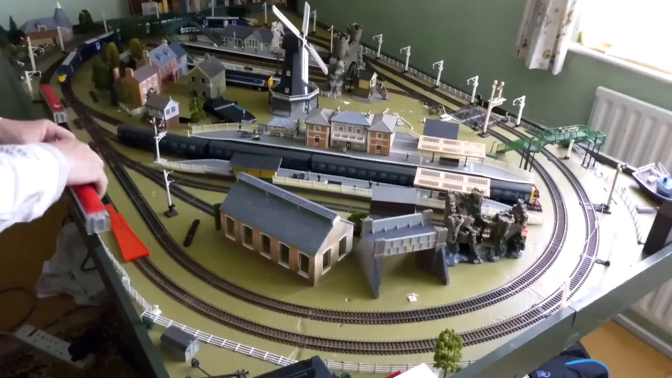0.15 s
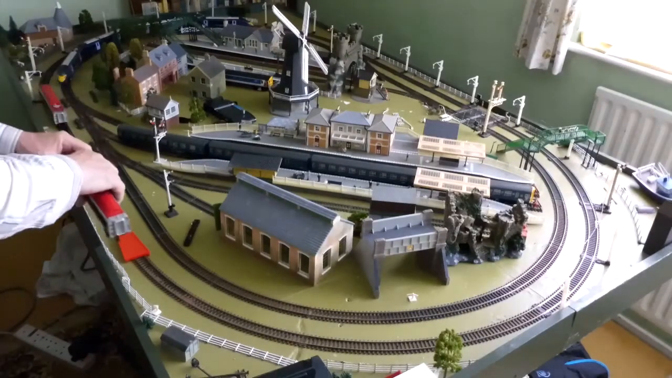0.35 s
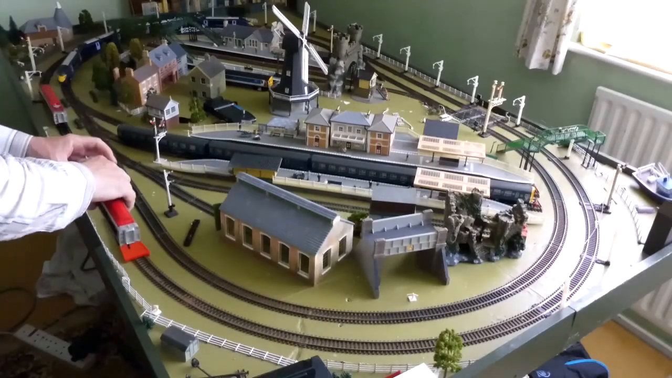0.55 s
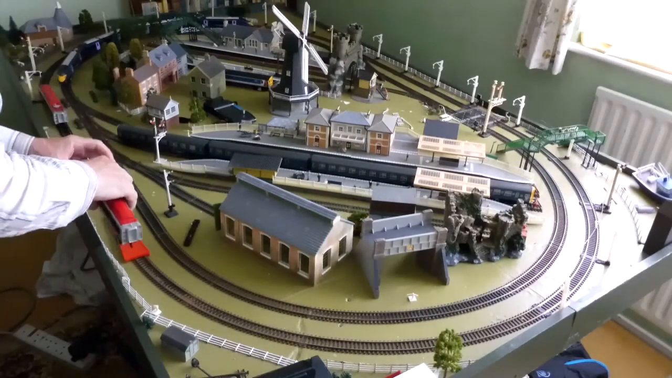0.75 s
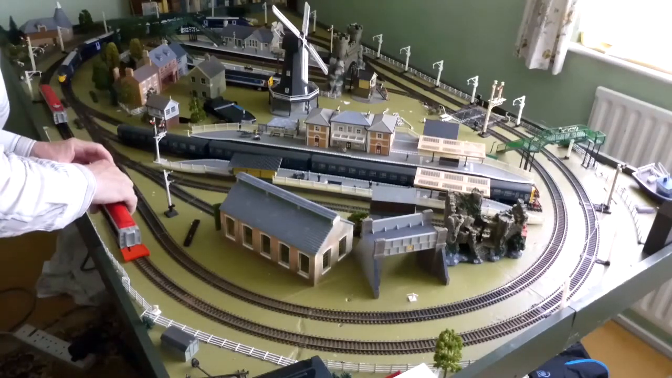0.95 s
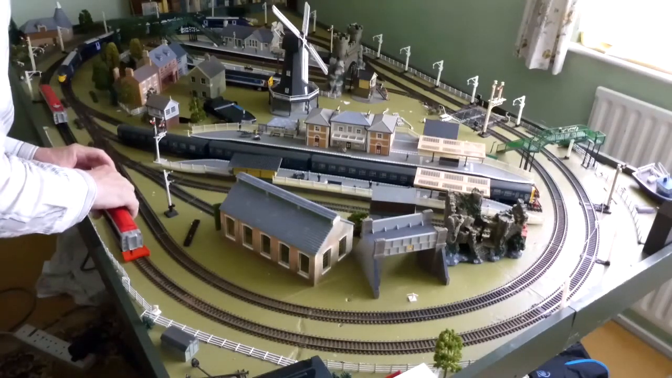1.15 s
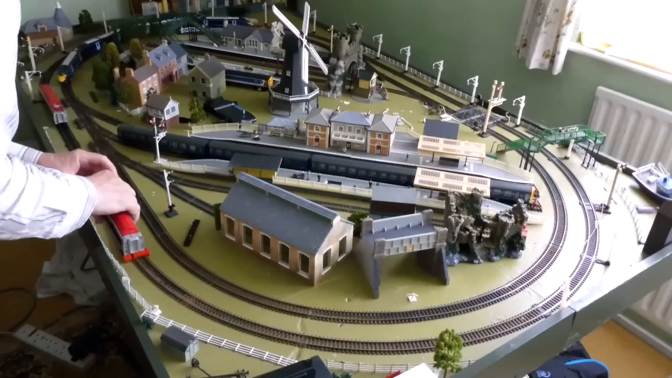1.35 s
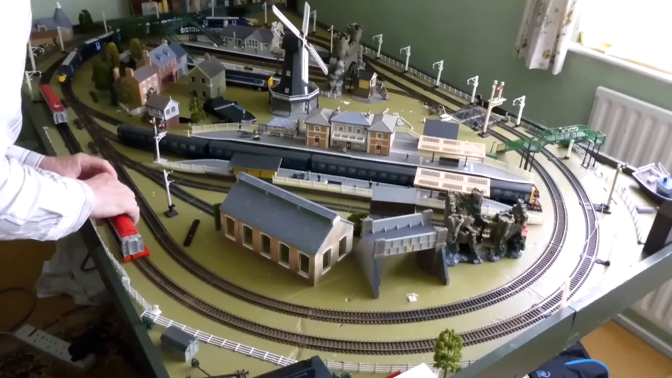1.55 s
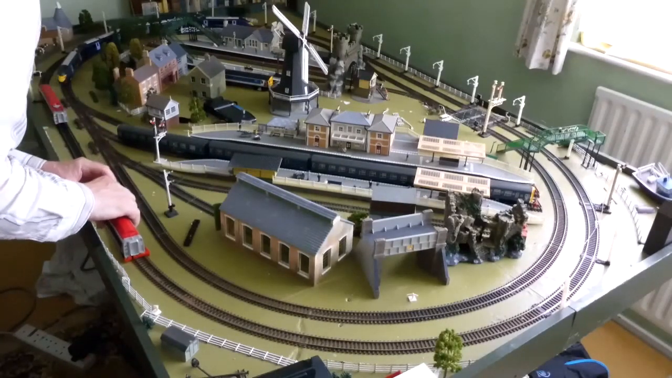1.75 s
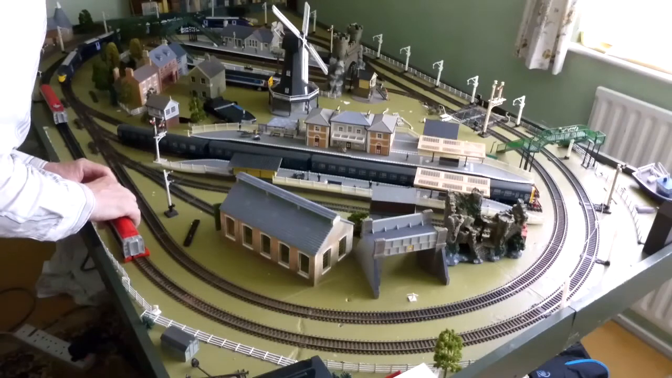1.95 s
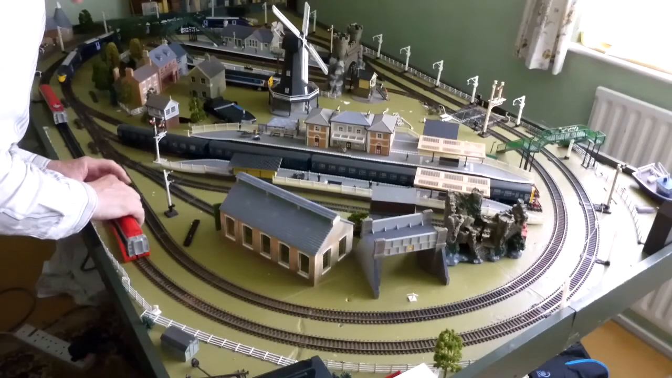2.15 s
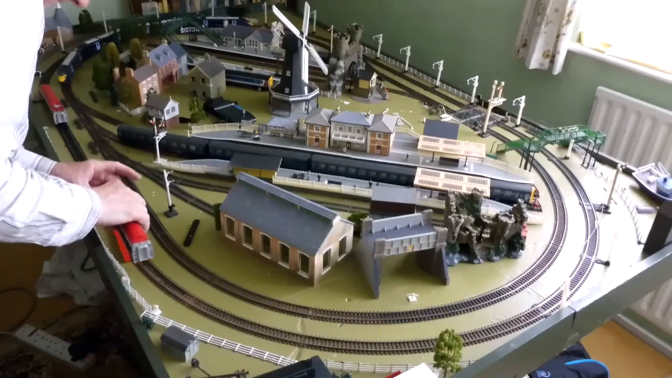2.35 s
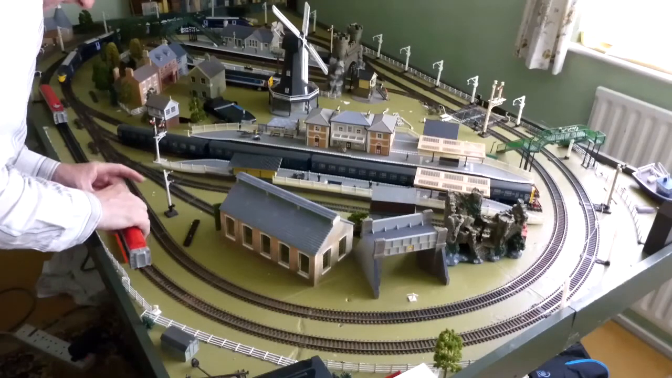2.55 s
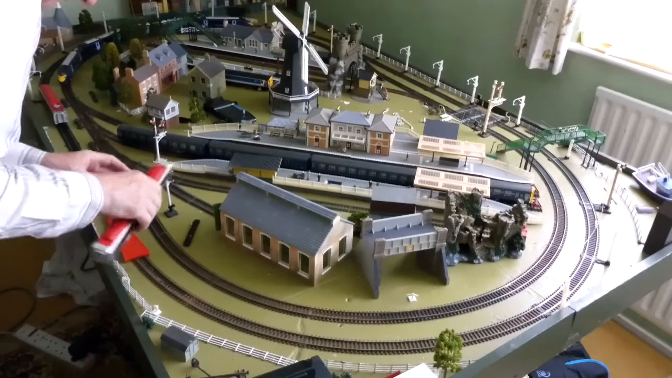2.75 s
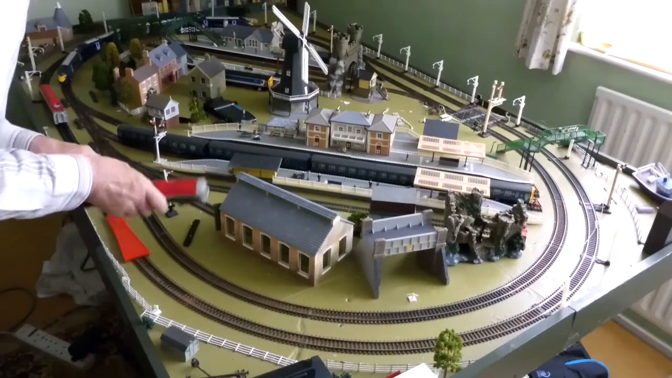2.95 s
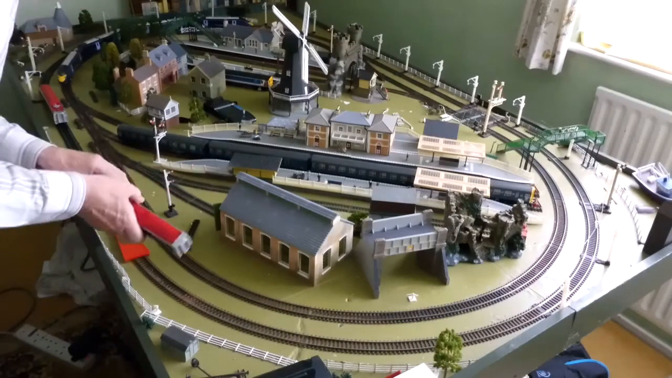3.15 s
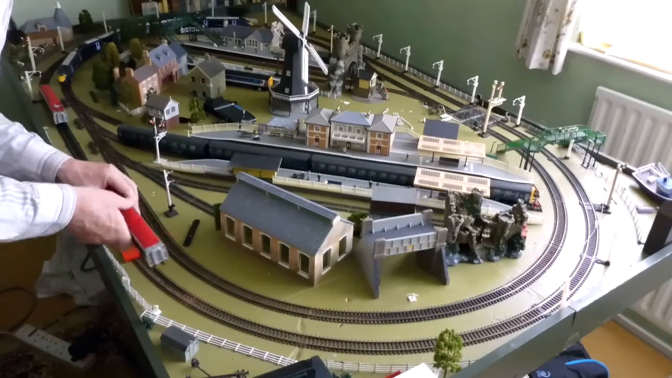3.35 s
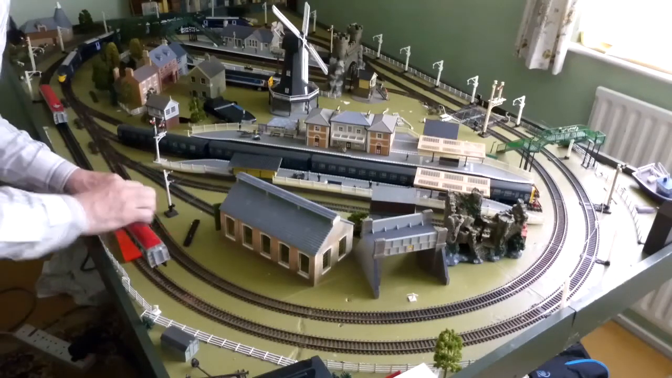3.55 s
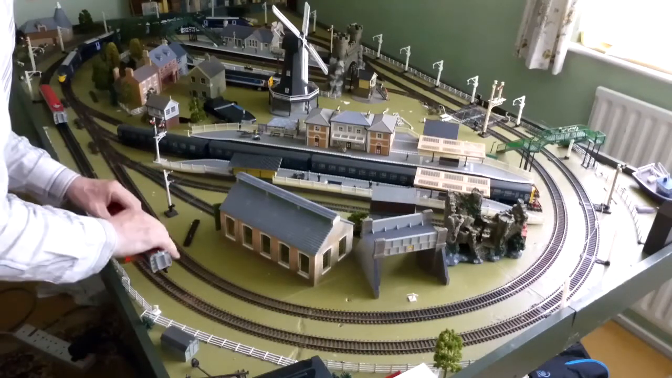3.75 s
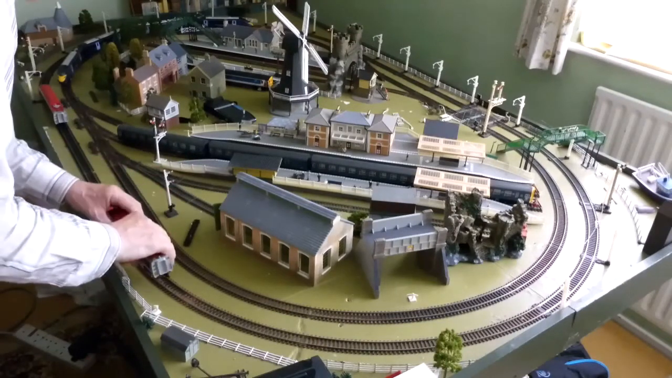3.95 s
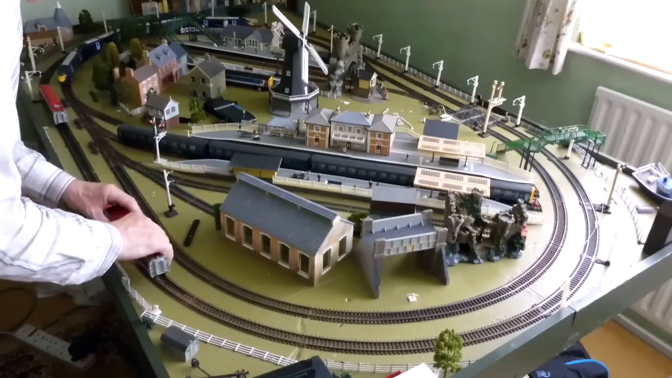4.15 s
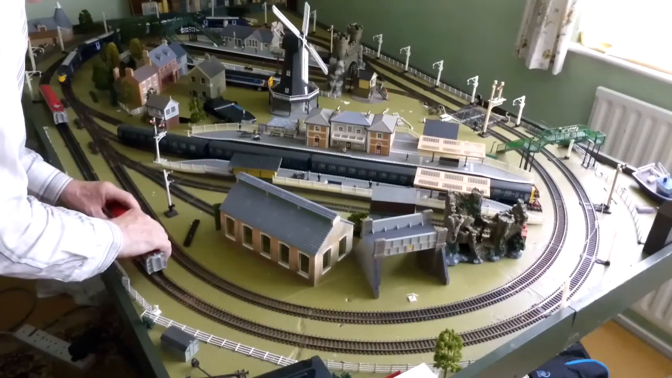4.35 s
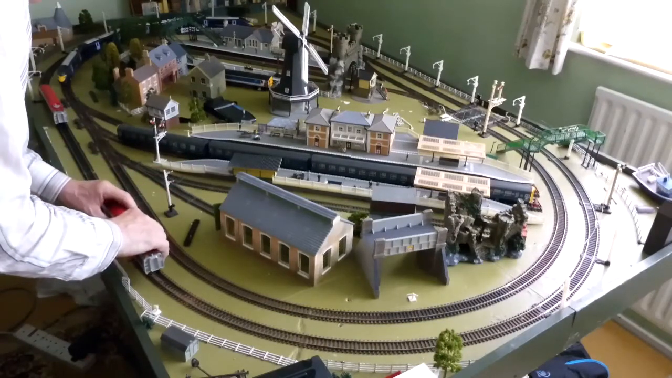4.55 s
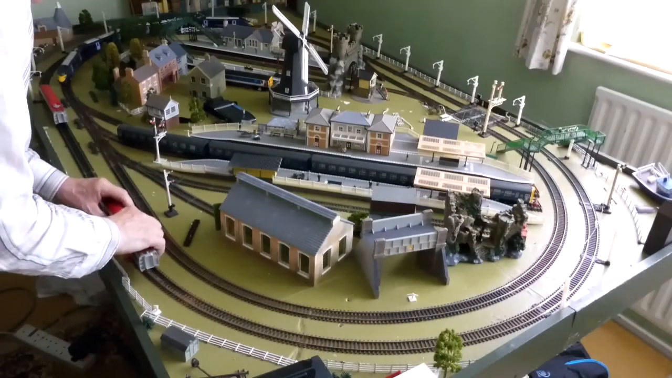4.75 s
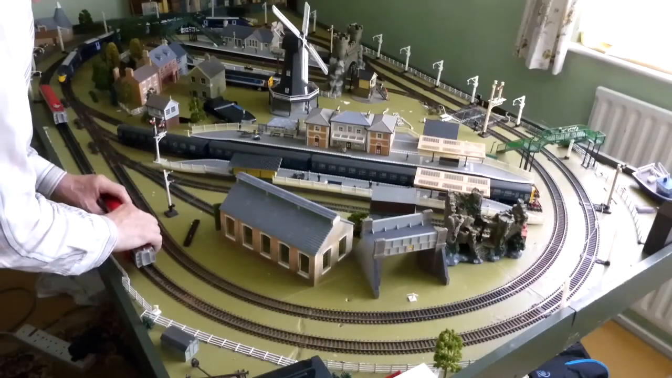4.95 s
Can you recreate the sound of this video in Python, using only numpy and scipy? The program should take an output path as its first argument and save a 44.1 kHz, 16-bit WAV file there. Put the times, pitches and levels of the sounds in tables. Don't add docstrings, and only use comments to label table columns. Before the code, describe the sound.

A light, hollow plastic model train car is handled on a track in a small furnished room, heard from about two metres by a small stereo camera with steady soft hiss and little bass. From 0 to 0.9 seconds there are quick quiet clicks, clacks and a brief wheel rub, with a rounder knock near 0.5. From 0.9 to 2.7 it is nearly still, with faint isolated taps around 1.4, 1.5, 1.8 and 2.3 to 2.65. At about 2.75 a small cluster of dull bumps starts, growing into busy rattling; the sharpest, loudest knocks fall around 3.15 to 3.5, with bright scraping on the rails. After a lighter moment near 3.6, another dense clatter runs from 3.7 to 4.15, with hollow low taps at its end. Then soft rubbing, faint ticks near 4.4, and one small dull knock at 4.9. Every knock is short, dry and chattering.

```python
import sys
import numpy as np
from scipy import signal
from scipy.fft import rfft, irfft
from scipy.io import wavfile
from scipy.ndimage import uniform_filter1d

SR = 44100
rng = np.random.default_rng(int(sys.argv[2]) if len(sys.argv) > 2 else 0)


def to_wav(s):
    ch = np.atleast_2d(s).T
    pcm = np.round(np.clip(ch, -1, 1) * 32767)
    wavfile.write(sys.argv[1], SR, pcm.astype(np.int16))


def invert_db(x):
    u = np.asarray(x, float) / 20
    return 10 ** u


N = 220852

# start_s [s], level_db [dB], bright_db [dB]
RUB = [(0, -50.5, -6), (.3, -68.5, 10), (.7, -59, 1.5), (1.0, -71, 9.5), (2.2, -66, 5), (2.7, -69, 7),
       (2.9, -52.5, 0.5), (3.1, -63.5, 10), (3.2, -50, 9), (3.42, -53, 7), (3.58, -74.5, 16),
       (4.0, -51.5, 3.5), (4.17, -57.5, 1), (4.27, -56.5, -1.5), (4.34, -64, 1), (4.49, -56.5, 9.5),
       (4.58, -65.5, 2), (5.01, -65, 8.5)]


def coloured(points):
    hz, db = np.transpose(points)
    f = np.maximum(np.fft.rfftfreq(N, 1 / SR), 1)
    gain = invert_db(np.interp(np.log(f), np.log(hz), db))
    x = irfft(rfft(rng.standard_normal((2, N))) * gain, N)
    return x / np.sqrt(np.mean(x ** 2))


def band(x, lo_hz, hi_hz):
    sos = signal.butter(2, [lo_hz, min(hi_hz, .45 * SR)], "band", fs=SR, output="sos")
    return signal.sosfilt(sos, x)


def ring(x, hz, t60_s):
    r = np.exp(-np.log(1000) / (t60_s * SR))
    w = 2 * np.pi * hz / SR
    return signal.lfilter([0, np.sin(w)], [1, -2 * r * np.cos(w), r * r], x)


def hiss():
    # pitch_hz [Hz], level_db [dB per Hz]
    hiss_colour = [(15, -58), (30, -40), (100, -20), (240, -7.5), (420, -2.5), (800, -3), (1340, -5.5),
                   (2070, -11.5), (2600, -19), (4000, -23), (5500, -24), (7500, -31.5), (10000, -36),
                   (15700, -44)]
    return coloured(hiss_colour) * invert_db(-52.5)


def board(near):
    loudness = np.sqrt(uniform_filter1d(near ** 2, size=600) + 1e-18)
    shake = loudness * rng.standard_normal((2, N))
    return invert_db(-20) * band(shake, 14, 70)


def room(x):
    t60_s, level_db, low_hz, top_hz = 0.22, -12.5, 166, 5330
    t = np.arange(int(.4 * SR)) / SR
    mid, side = rng.standard_normal((2, len(t))) * invert_db(-60 * t / t60_s) * (t > .004)
    echo = band(mid + 0.23 * side * np.array([[1], [-1]]), low_hz, top_hz)
    echo *= invert_db(level_db) / np.sqrt(np.sum(echo ** 2) / 2)
    return signal.fftconvolve(x.mean(axis=0)[None], echo, axes=1)[:, :N]


def ticks():
    # start_s [s], pitch_hz [Hz], level_db [peak dB], t60_s [s]
    small_parts = [(.1540, 1620, -35.5, 0.02), (.3440, 2200, -44.5, .041), (.4815, 565, -34, 0.037),
                   (0.532, 1510, -43, 0.027), (.5830, 2080, -41, .018), (.5840, 3320, -49, 0.015),
                   (0.647, 1350, -42.5, 0.095), (.7550, 2300, -52, 0.027), (0.841, 2050, -43, 0.031),
                   (1.3710, 5600, -51, 0.017), (1.5270, 2565, -45.5, 0.023), (1.5290, 627, -44, 0.12),
                   (2.3380, 1200, -45.5, 0.091), (2.4500, 551, -41, 0.072), (2.5880, 2350, -53, .02),
                   (2.8280, 2500, -44, 0.026), (2.8530, 690, -49, 0.055), (3.0430, 6000, -56, 0.052),
                   (3.1500, 2164, -27.5, .025), (3.231, 1700, -22.5, 0.012), (3.2340, 473, -22.5, 0.021),
                   (3.4520, 8400, -62, 0.056), (3.4540, 629, -23, 0.063), (3.4700, 6600, -47, .02),
                   (4.067, 2560, -37, 0.033), (4.0750, 437, -30, 0.1), (4.097, 320, -27, 0.021),
                   (4.1250, 390, -29, 0.02), (4.9090, 2650, -47, 0.023)]
    out = np.zeros(N)
    for start_s, hz, db, t60_s in small_parts:
        blow = invert_db(db) * (np.arange(N) == int(start_s * SR))
        out += ring(blow, hz, t60_s) - invert_db(-12.0) * ring(blow, hz, 0.44 * t60_s)
    return out


def knocks():
    # start_s [s], level_db [peak dB], spot_hz [Hz] of the place struck, hardness_db [dB]
    thuds = [(0.2336, -45, 640, -27), (.4785, -37, 676, -20), (1.5234, -48.5, 627, -16),
             (1.842, -50.5, 670, -29), (2.2838, -46, 885, -26), (2.4484, -51, 593, -19),
             (2.6134, -49.5, 620, -29), (2.6561, -51, 667, -22), (2.7489, -50, 627, -20),
             (2.7741, -37, 670, -20.5), (2.8029, -41, 700, -21), (2.828, -38, 640, -20),
             (2.8485, -37, 620, -22.5), (2.9453, -41, 597, -23), (3.2307, -30, 696, -13),
             (3.2434, -33.5, 614, -30), (3.4511, -38, 630, -16), (3.4923, -37, 719, -15),
             (3.6325, -45, 1060, -10.5), (3.66, -39, 518, -33), (3.685, -42.5, 530, -25),
             (3.9164, -35, 590, -19), (4.0686, -40, 420, -7), (4.1342, -41.5, 755, -14),
             (4.369, -48, 750, -29), (4.9092, -38.5, 452, -26.5)]
    clacks = [(.0034, -38.5, 1190, -30), (0.0635, -42, 1130, -18), (0.0826, -38.5, 1180, -19.5),
              (0.1089, -42.5, 1190, -25), (.154, -40.5, 1190, -28), (0.2185, -42.5, 940, -22),
              (.3042, -43, 1500, -20), (0.6447, -40, 1180, -20), (2.3386, -40, 1190, -26),
              (2.92, -38, 1350, -15.5), (2.9347, -34, 606, -18.5), (2.9845, -38, 1150, -20.5),
              (3.0446, -36.5, 1340, -16), (3.0619, -37.5, 1234, -28), (3.277, -35, 704, -7),
              (3.34, -28.5, 1440, -18.5), (3.3541, -28, 1420, -21.5), (3.73, -38, 1270, -11),
              (3.7594, -40, 990, -29), (3.8933, -30.5, 1145, -23), (3.9309, -36, 720, -28),
              (3.9423, -30, 1405, -15.5), (3.9595, -38, 1210, -28), (4.0568, -37.5, 1340, -26),
              (4.0915, -27, 730, -18.5)]
    snaps = [(0.3308, -40.5, 1330, -28), (0.3433, -44, 1680, -24), (.5312, -38.5, 1370, -20.5),
             (.5826, -37, 633, -22), (.7317, -46.5, 630, -25), (.7534, -46.5, 2200, -23),
             (.842, -45.5, 633, -23), (2.954, -32.5, 530, -16.5), (3.1495, -34.5, 2100, -11.5),
             (3.1672, -33, 2100, -16), (3.2574, -40, 730, -16), (3.2914, -41.5, 1460, -26),
             (3.3894, -41.5, 1250, -28), (3.4744, -35.5, 646, -15.5), (3.7371, -38.5, 1035, -32),
             (3.832, -42, 1110, -28), (3.8729, -39, 1130, -17), (3.9054, -31, 658, -14),
             (4.0388, -38, 1190, -14), (4.0774, -31.5, 732, -15.5), (4.1041, -31.5, 440, -18),
             (4.459, -51, 1480, -18)]
    # shell_db [dB], clips_db [dB]
    shares = [(-0.5, -8.5), (-10, -14), (-6.5, -3.5)]
    rows = []
    for kind, (shell_db, clips_db) in zip((thuds, clacks, snaps), shares):
        for start_s, level_db, spot_hz, hard_db in kind:
            rows.append((start_s, level_db, shell_db, clips_db, hard_db, spot_hz))
    return np.array(rows)


def cracks():
    start_s, level_db, _, _, hard_db, _ = knocks().T
    blows = np.bincount((start_s * SR).astype(int), invert_db(level_db + hard_db / 2 + 3), N)
    return band(blows, 1200, 5000)


def chatter(start_s, count, scatter_db):
    bounce_s = .032
    chance = rng.random((len(start_s), 2 * count))
    late = chance[:, :count] * (np.arange(count) > 0)
    scatter = scatter_db * (chance[:, count:] - .5)
    fade_db = -11 * late ** 2 + (scatter - 10) * (late > 0)
    place = ((start_s[:, None] + bounce_s * late) * SR).astype(int)
    return np.clip(place, 0, N - 1), invert_db(fade_db)


def rub_curves():
    start_s, level_db, bright_db = np.transpose(RUB)
    t = np.arange(N) / SR
    return np.interp(t, start_s, level_db), np.interp(t, start_s, bright_db)


def rub_grains(level_db, rate_hz):
    grains = (rng.random(N) < rate_hz / SR) * rng.standard_normal(N)
    return invert_db(level_db - 22.0) * grains * np.sqrt(SR / rate_hz)


def rasp(place, size, rub_db):
    # pitch_hz [Hz], level_db [dB per Hz]
    rasp_colour = [(1500, -9), (2800, 0), (3800, -2.5), (5000, 0), (6500, -5.5), (8000, -8.5), (10000, -20),
                   (13000, -27), (16000, -24)]
    skid = np.minimum(size, 0.86 * size[:, :1])
    power = np.bincount(place.ravel(), skid.ravel() ** 2, N)
    t = np.arange(1500) / SR
    swell = np.exp(-t / .005) - np.exp(-t / .001)
    power = signal.fftconvolve(power, swell)[:N]
    mid, side = coloured(rasp_colour)
    level = np.sqrt(np.maximum(power, 0) + invert_db(rub_db) ** 2)
    return level * np.array([mid + 0.67 * side, mid - 0.61 * side])


def patchy(x, patchy_db, rate_hz):
    out, hold = 0, int(SR / rate_hz)
    edges_hz = (1200, 3400, 4400, 5500, 6800, 8300, 19000)
    for lo_hz, hi_hz in zip(edges_hz[:-1], edges_hz[1:]):
        steps = np.repeat(rng.standard_normal(N // 100), hold)[:N]
        walk = uniform_filter1d(steps, hold)
        out = out + invert_db(patchy_db * walk) * band(x, lo_hz, hi_hz)
    return out


def spot_lift(part, spot_hz):
    lift_db, reach_octaves = 13, 0.094
    lift = []
    for hz, _, _ in part:
        octaves = np.log2(hz / spot_hz)
        lift.append(invert_db(lift_db * np.exp(-(octaves / reach_octaves) ** 2)))
    lift = np.array(lift)
    return lift / np.sqrt(np.mean(lift ** 2, axis=0))


def ring_part(part, place, blow, drag, spot_hz, apart):
    sound = 0
    for (hz, db, t60_s), favour in zip(part, spot_lift(part, spot_hz)):
        spot, other = rng.standard_normal((2,) + place.shape)
        spot[:, 0] = 1.053 * np.sign(spot[:, 0])
        hit = blow * favour[:, None]
        mid = np.bincount(place.ravel(), (hit * spot).ravel(), N)
        side = np.bincount(place.ravel(), (hit * other).ravel(), N)
        mid = ring(mid + drag, hz, t60_s)
        side = apart * ring(side + np.roll(drag, int(hz)), hz, t60_s)
        sound = sound + invert_db(db) * np.array([mid + side, mid - side]) / np.sqrt(len(part))
    return band(sound, 0.82 * part[0][0], 1.34 * part[-1][0])


def car():
    # pitch_hz [Hz], level_db [dB], t60_s [s]
    panels = [(955, -1.5, 0.028), (1077, 3.5, 0.044), (1190, 1, 0.04), (1270, -0.5, 0.05),
              (1340, -1.5, 0.063), (1459, 0.5, 0.031), (1613, 3.5, 0.039), (1770, -3, 0.031)]
    shell = [(340, -26, 0.017), (385, -2, 0.02), (485.7, -2, 0.11), (530, 2, 0.071), (633, 7, 0.049),
             (734.2, 4.5, 0.082), (848, -1, 0.07)]
    clips = [(1928, -1, 0.038), (2100, 4.5, 0.016), (2240, 1.5, 0.015), (2432, 2, 0.014),
             (2620, -10, 0.057), (2930, -23, 0.027), (3285, -8.5, 0.023)]
    wheels = [(3940, -21.5, 0.014), (4850, -14, 0.0085), (4950, -4, 0.015), (5480, -15.5, 0.0038),
              (6250, -0.5, 0.009), (6650, -8, 0.0077), (7870, -1, 0.0022)]
    part_db = [-3, -2, 0, 9.5]
    part_apart = [0.077, 0.036, 0.2, 0.94]
    drag_db = [0.5, -3, -6.5, -10.5]

    start_s, level_db, shell_db, clips_db, hard_db, spot_hz = knocks().T
    place, size = chatter(start_s, count=24, scatter_db=8)
    rub_db, bright_db = rub_curves()
    rub = rub_grains(rub_db, rate_hz=1200)

    skid_size = size * invert_db(level_db + hard_db + 5)[:, None]
    skid = rasp(place, skid_size, rub_db + bright_db - 14.5)
    out = patchy(skid, patchy_db=2.5, rate_hz=90)
    share_db = (0, shell_db, clips_db, hard_db)
    for k, part in enumerate((panels, shell, clips, wheels)):
        blow = size * invert_db(level_db + share_db[k] + part_db[k])[:, None]
        drag = rub * invert_db(drag_db[k] + k * bright_db / 2)
        out = out + ring_part(part, place, blow, drag, spot_hz, part_apart[k])
    return out


def scene():
    near = car() + ticks() + cracks()
    bass_cut = signal.butter(3, 374, "high", fs=SR, output="sos")
    return signal.sosfilt(bass_cut, near + room(near)) + board(near) + hiss()


def low_pass(x):
    return signal.sosfilt(signal.butter(12, 15730, fs=SR, output="sos"), x)


def record(dry):
    return low_pass(dry)


dry = scene()
out = record(dry)
to_wav(out)
```